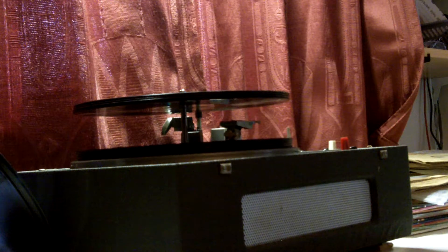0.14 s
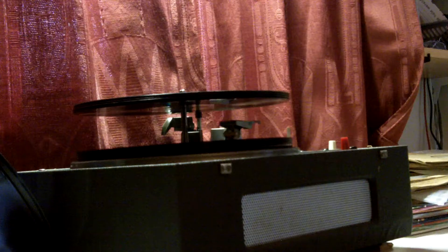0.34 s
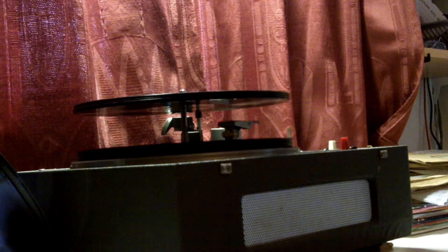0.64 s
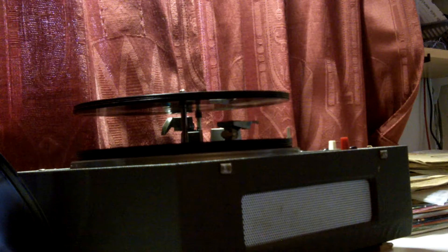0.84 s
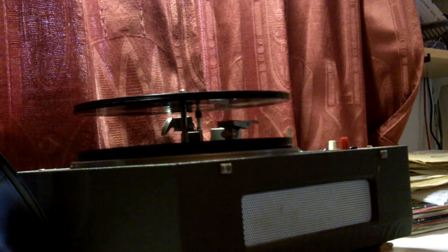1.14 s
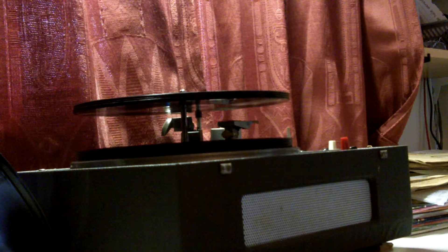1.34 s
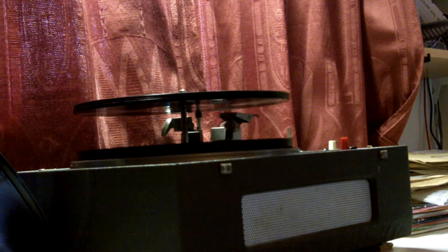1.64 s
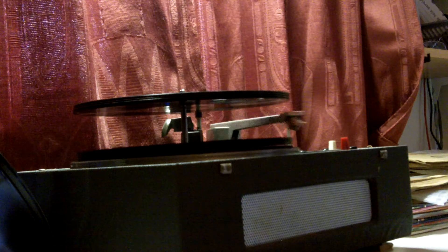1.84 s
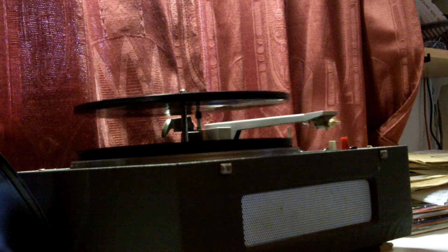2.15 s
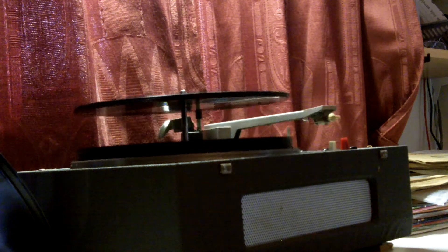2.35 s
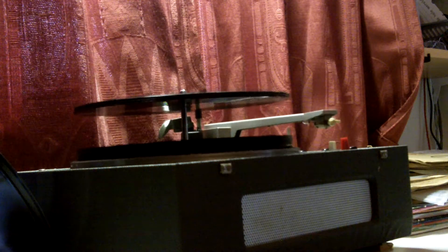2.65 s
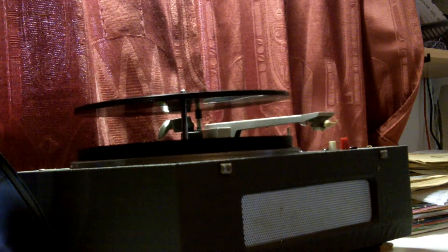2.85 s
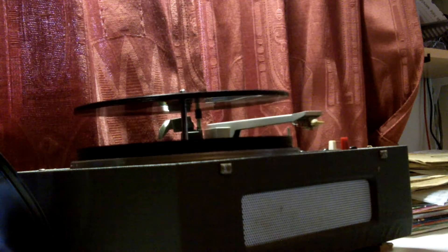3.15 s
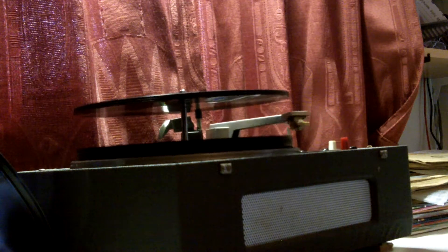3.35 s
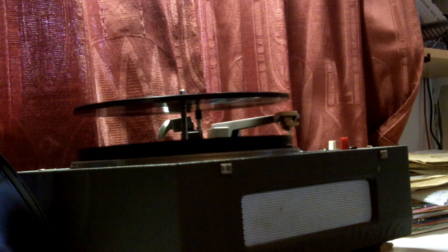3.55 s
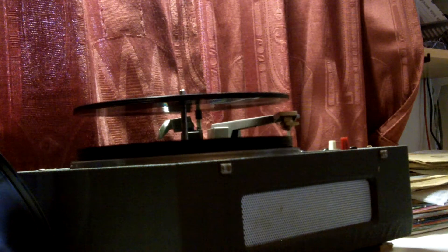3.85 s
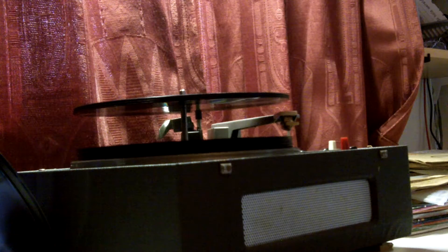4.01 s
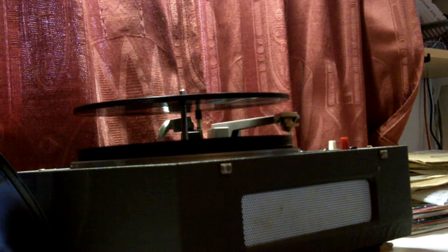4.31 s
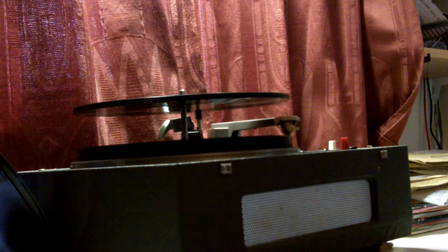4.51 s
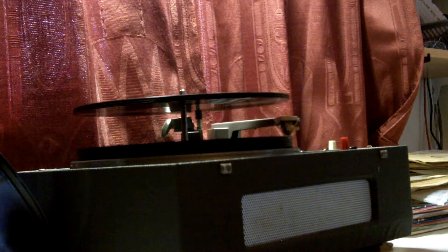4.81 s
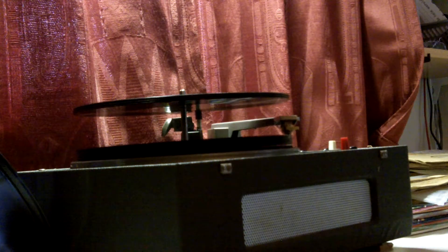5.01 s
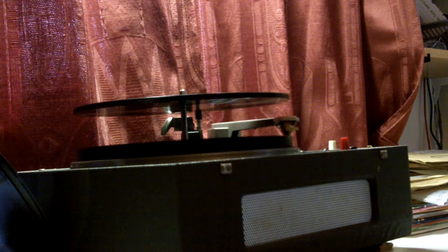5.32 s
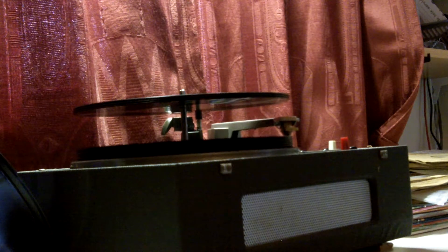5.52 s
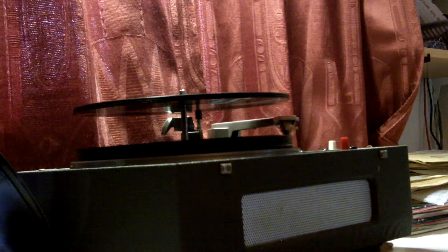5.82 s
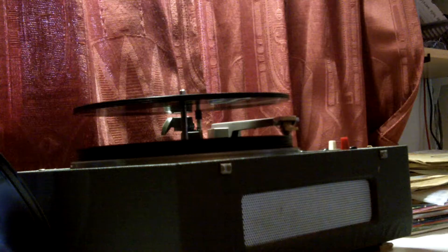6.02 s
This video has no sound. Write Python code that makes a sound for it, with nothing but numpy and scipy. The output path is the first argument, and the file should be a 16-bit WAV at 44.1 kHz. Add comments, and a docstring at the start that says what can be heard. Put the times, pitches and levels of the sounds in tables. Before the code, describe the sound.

Steel levers and cams of a record player knock against a deck plate and wooden cabinet, dry and close, with very short room reflections. Irregular bursts are separated by near-quiet holding only tiny ticks and faint rubbing. The strongest blows come in the middle; late on, a gear grinds softly with small woody ticks before one last clunk. Steady faint hum, deep room rumble and camera hiss lie behind.

```python
"""In a quiet curtained room, the changer of an old record player runs through its cycle close to a small camera.
Levers and cams click and clunk: each blow rings the steel parts, the deck plate and the wooden cabinet as
fading sines and noise bursts, and a few leave a thin part ringing. Between blows the cam gear rubs and ticks,
as noise through the same resonances. Behind it are motor hum, building rumble, air noise and camera hiss."""
import sys
import numpy as np
from scipy import signal
from scipy.fft import rfft, irfft, next_fast_len
from scipy.io import wavfile
from scipy.ndimage import map_coordinates

SR = 44100
rng = np.random.default_rng(int(sys.argv[2]) if len(sys.argv) > 2 else 0)


def dump_mix(stems):
    """Bounce the given channels to the path in sys.argv[1] as a 16-bit WAV at rate SR."""
    frames = np.atleast_2d(stems).T  # one column per channel
    limited = np.clip(frames, -1, 1)  # hard clip at full scale
    pcm = np.round(limited * 32767).astype(np.int16)
    wavfile.write(sys.argv[1], SR, pcm)


N = 272097

# Ways in which each part can ring: (pitch [Hz], relative level [dB], nominal time to fade by 60 dB [s])
# wooden cabinet
CABINET_MODES = [(179.5, 0.5, 0.18), (260.9, 0.5, 0.23), (308.7, -1.5, 0.16), (369.6, -7, 0.32)]
# deck plate
PLATE_MODES = [(560, -21, 0.072), (620, -12.5, 0.068), (765.8, -1.5, .11), (800, -7, 0.088),
               (901, -12.5, 0.079), (936, -12.5, 0.08)]
# steel levers
LEVER_MODES = [(1240, -1.5, 0.099), (1397, 3.5, 0.17), (1590, -3, 0.056), (1707, 4, 0.12),
               (1875, 6.5, 0.15), (2103, 7, 0.12), (2194, 10.5, 0.086), (2303, 7.5, 0.095),
               (2585, 9.5, 0.038)]
# pawls
PAWL_MODES = [(2954, -2, 0.052), (3140, -23.5, 0.013), (3300, -1.5, 0.099), (3442, 6, 0.074)]


def amp(db):
    """Turn decibels into a gain."""
    return 10 ** (np.asarray(db) / 20)


def unit(x):
    """Scale a signal to an rms of 1."""
    return x / np.sqrt(np.mean(x ** 2) + 1e-20)


def along(points, hz):
    """Read a value between (frequency, value) points on a nearly logarithmic frequency axis."""
    f, v = np.transpose(points)
    return np.interp(np.log(hz + 0.19), np.log(f + 0.066), v)


def curves(rows):
    """Draw one curve over the whole scene for each column after the time."""
    s, *cols = np.transpose(rows)
    return [np.interp(np.arange(N) / SR, s, c) for c in cols]


def wobble(rate):
    """Make a smooth random curve through `rate` random points a second."""
    points = rng.standard_normal(int(N * rate / SR) + 4)
    return map_coordinates(points, [np.arange(N) * rate / SR])


def filtered(x, response):
    """Filter a signal by multiplying its spectrum with a response to frequency."""
    n = x.shape[-1]
    m = next_fast_len(n + 8192)  # spare room keeps the filter's tail from wrapping round
    return irfft(rfft(x, m) * response(np.fft.rfftfreq(m, 1 / SR)), m)[..., :n]


def resonance(f, hz, width_hz):
    """Response of one resonance: 1 at its centre, weaker to both sides."""
    return 1j * f * width_hz / (hz * hz - f * f + 1j * f * width_hz)


def noise(spectrum):
    """Make noise of rms 1, coloured by (frequency, relative level) points."""
    return unit(filtered(rng.standard_normal(N), lambda f: amp(along(spectrum, f))))


def ring(modes, t, centre_hz, loss_db_per_octave, attack_s, damping, luck):
    """Ring a struck part as fading sines; modes near the centre are favoured, and luck varies each blow."""
    hz, db, t60 = (np.array(c)[:, None] for c in zip(*modes))
    octaves_away = np.abs(np.log2(hz / centre_hz))
    gain = amp(db - loss_db_per_octave * octaves_away + 1.9 * luck[:len(hz), None])
    fade = amp(-60 * t / (t60 * damping))
    phase = 2 * luck[-len(hz):, None]
    waves = gain * fade * np.sin(2 * np.pi * hz * t + phase)
    return waves.sum(0) * (1 - np.exp(-t / attack_s)) / np.linalg.norm(gain)


def clatter(t, centre_hz, width_hz, top_hz, t60, crack_db):
    """Countless short modes blur into noise around a centre: a crack, then a dying hiss, weaker above top_hz."""
    shape = amp(-60 * t / t60) + amp(crack_db - 60 * t / 0.0076)

    def colour(f):
        rolloff = (1 + 1j * f / top_hz) ** 3
        make_up = (1 + (centre_hz / top_hz) ** 2) ** 1.5  # restores the level at the centre
        return resonance(f, centre_hz, width_hz) / rolloff * make_up

    burst = filtered(rng.standard_normal(len(t)) * shape, colour)
    return burst / np.sqrt(width_hz * np.pi / SR)


def contacts():
    """List every contact of parts as a full row; some columns are the same for many contacts."""
    # Heavy blows of levers and cams; part levels are relative to the blow level:
    # (time [s], blow level [dB], cabinet level [dB], cabinet centre [Hz], plate level [dB], lever level [dB],
    #  lever centre [Hz], pawl level [dB], catch level [dB], catch centre [Hz], fade setting [s])
    heavy = [(1.1794, -28, -11, 151, -39, -23, 1770, -21, -8, 6200, .13),
             (1.1832, -22.5, -7.5, 214, -35, -35, 2730, -17, -8, 8760, 0.058),
             (1.2104, -33, -10, 280, -22, -8.5, 1210, -35, -26, 7110, 0.18),
             (1.2226, -26.5, -10, 179, -13, -10.5, 2090, -15, -12.5, 6040, 0.12),
             (1.2501, -28.5, -39, 277, -28, -7.5, 1420, -3.5, -8.5, 7300, 0.077),
             (1.3414, -39, -15, 151, -4, -2.5, 2210, -5, -10.5, 5740, 0.1),
             (1.5269, -39.5, -31, 151, -7.5, -7.5, 1680, -9.5, -12, 6300, 0.12),
             (1.9106, -24.5, -36, 350, -10.5, -7, 2070, -7.5, -2.5, 7000, .11),
             (1.9599, -40, -28, 197, -10, -34, 2760, -33, 0.5, 6440, 0.061),
             (2.0378, -41.5, -30, 172, -11, -7.5, 1640, -13, -15, 6640, 0.051),
             (2.2942, -20.5, -15, 283, -1.5, -18, 1380, -24, -11, 7000, 0.086),
             (2.3421, -27, -22, 320, -14, -11, 1820, -35, -10, 7200, .11),
             (2.391, -30, -25, 151, -18, -18, 1590, -15, 3, 7700, 0.14),
             (2.4109, -18.5, -18.5, 283, -32, -10.5, 2250, -22, -1.5, 7430, 0.12),
             (2.4274, -13, -33, 336, -14, -22, 2000, -43, -14, 7070, 0.15),
             (2.4394, -18, -18.5, 178, -8.5, -23, 2240, -29, -11, 6600, 0.06),
             (2.4514, -25.5, -20, 151, -28, -22, 2040, -28, 0.5, 7040, 0.052),
             (2.4714, -34, -12.5, 151, -25, -14, 1970, -26, -13, 6800, 0.19),
             (2.7427, -18, -37, 304, -12.5, -12.5, 2430, -8, -14.5, 6850, 0.077),
             (3.1004, -37.5, -36, 172, -6, -3, 2240, -6, -22, 6500, 0.091),
             (3.5414, -35, -11, 191, 9, -5, 1820, -23, -5, 6800, 0.078),
             (3.5453, -23.5, -9, 292, 3.5, -12.5, 2270, -23, -5.5, 7300, 0.08),
             (3.5937, -20.5, -19.5, 260, -8.5, -13, 2260, -27, -9, 7160, 0.088),
             (3.7808, -14.5, -24, 264, -2.1, -14.5, 1290, -21.5, -7, 7650, 0.094),
             (4.6853, -34, -6, 268, -6, -8, 1810, -9.5, -19, 7950, 0.047),
             (4.7905, -32.5, -4, 264, 0.5, -6.5, 1280, -10.5, -22.5, 7900, 0.044),
             (4.9484, -32.5, -7.5, 264, -18, -16.5, 1330, -45, -38, 7610, 0.13),
             (4.9601, -29.5, -28, 256, -18, -19.5, 1360, -20, -2, 7040, 0.076),
             (5.5972, -30.5, -3.5, 151, -15, -4.5, 1600, -24, -11, 6670, 0.12),
             (5.5992, -17.5, -14.5, 253, -4.5, -14.5, 2700, -18.5, -6.5, 6780, 0.081)]
    # Light ticks of loose parts:
    # (time [s], tick level [dB], cabinet level [dB], lever centre [Hz], catch level [dB])
    light = [(0.0917, -50.5, -6, 1320, -12), (0.399, -50, -6, 1800, -19), (0.4615, -49, -10, 1800, -14),
             (0.6897, -50.5, -6, 1900, -11), (0.8477, -42.5, 0.5, 1800, -24), (1.0374, -46, -19, 1860, -22),
             (1.4054, -43.5, -30, 1350, -16.5), (1.4561, -48, -28, 1770, -8), (1.6191, -48, 12, 2610, -29),
             (1.8038, -44, -22, 1360, -18.5), (2.2124, -48, -22, 1390, -4.5),
             (2.2907, -34.5, -29, 1750, -12), (2.5973, -50, -30, 1310, -6), (2.6978, -53, -9, 1390, -11),
             (3.2181, -66.5, -17, 1280, 7), (3.5164, -49, -3, 1590, -10.5), (3.5709, -36.5, -15, 1200, -21),
             (3.727, -58, -14, 1400, -25), (3.7778, -43, -26, 1400, 1), (3.925, -51, -22, 1410, -13),
             (4.013, -56.5, -14, 1350, -1), (4.2055, -53.5, -1.5, 1400, -21), (5.241, -55.5, 5, 1310, -8),
             (5.5398, -56, 0, 1300, -16), (5.6298, -54, 15.5, 1420, -12)]
    # Teeth of the cam gear dropping into mesh:
    # (time [s], tooth level [dB], cabinet level [dB], cabinet centre [Hz], pawl level [dB])
    mesh = [(4.715, -48, -15, 256, -14), (4.7358, -51, 0, 191, -14), (4.8452, -42.5, -1, 194, -15),
            (4.8745, -46, -14, 178, -17), (4.897, -49, -9, 183, -20), (4.9264, -44.5, -3, 291, -24),
            (5.009, -44.5, -7, 258, -15), (5.044, -42, 1.5, 210, -6), (5.0591, -42, -9, 183, -17),
            (5.078, -41.5, -17, 188, -18), (5.1073, -45.5, -1, 275, -9), (5.1312, -53.5, 14.5, 178, -12)]

    # fill in the missing columns, in the order of the heavy blows
    tick_rows = [(s, db, box_db, 194.4, -16, -9, lever_hz, -14, catch_db, 6770, 0.11)
                 for s, db, box_db, lever_hz, catch_db in light]
    tooth_rows = [(s, db, box_db, box_hz, -7, -8, 1930, pawl_db, -24, 6900, 0.086)
                  for s, db, box_db, box_hz, pawl_db in mesh]
    return heavy + tick_rows + tooth_rows


def blows():
    """Every blow shakes cabinet, plate, levers, pawls and catches in its own proportions."""
    # Modes of the small catches: (pitch [Hz], relative level [dB], nominal time to fade by 60 dB [s])
    catch_modes = [(5420, 8, 0.084), (5730, 2, 0.1), (6300, -26, .07), (5980, 4, 0.088), (6350, 0, 0.09),
                   (6430, 12.5, 0.088), (6890, 19, 0.026), (7400, -17, .1), (8300, 2, .1), (8650, -20, .08),
                   (8450, 0, .08), (9200, -20, .08)]
    out, t = np.zeros(N + SR), np.arange(SR * 2 // 5) / SR
    rows = contacts()
    lucks = rng.standard_normal((len(rows), 6, 24))
    for row, luck in zip(rows, lucks):
        s, db, box_db, box_hz, plate_db, lever_db, lever_hz, pawl_db, catch_db, catch_hz, t60 = row
        thud_db = -13 - 0.35 * (db + 45)  # a harder contact has a relatively weaker dull knock
        damping = np.clip(t60, .02, .4) / .12  # a part that is held rings shorter
        # the share of clear ringing against grating noise varies at random from blow to blow
        clean = 0.51 + 0.082 * luck[5, 0]
        tone, grit = np.sqrt(np.clip([clean, 1 - clean], .02, .98))

        box = ring(CABINET_MODES, t, box_hz, 23.8, 0.0036, 0.85, luck[0])
        thud = clatter(t, 760, 430, 1770, .1 * damping, 4.4)
        plate = ring(PLATE_MODES, t, 550, 2.8, 0.0029, damping, luck[1])
        lever = tone * ring(LEVER_MODES, t, lever_hz, 26 * clean, 0.0011, damping, luck[2])
        lever += 0.89 * grit * clatter(t, lever_hz, 830, 2820, .11 * damping, 0)
        pawl = tone * ring(PAWL_MODES, t, 3600, 3, 0.0017, damping, luck[3])
        pawl += 0.97 * grit * clatter(t, 3080, 810, 6400, .1 * damping, 0)
        catch = 0.8 * tone * ring(catch_modes, t, catch_hz, 36 * clean, 0.0012, damping, luck[4])
        catch += 1.075 * grit * clatter(t, catch_hz, 1480, 8800, .11 * damping, 0.73)

        panels = amp(box_db) * box + amp(thud_db) * thud + amp(plate_db) * plate
        panels *= 1 - np.exp(-t / 0.0026)  # large panels take time to answer
        steel = amp(lever_db) * lever + amp(pawl_db) * pawl + amp(catch_db) * catch
        out[round(s * SR):][:len(t)] += amp(db) * (panels + steel)
    return filtered(out[:N], lambda f: 1 / (1 + 1j * f / 13000) ** 2)  # blunt contacts carry little treble


def springs():
    """A spring or thin part rings on as a pure tone that slowly fades."""
    # Ringing parts: (pitch [Hz], time to fade by 60 dB [s], list of starts (time [s], level [dB]))
    ringing_parts = [(803, .9, [(2.295, -57), (3.781, -56), (5.599, -59)]), (2190, .15, [(2.743, -33),
                     (3.1, -50), (3.781, -51)]), (5680, .4, [(3.781, -53)])]
    out, t = np.zeros(N + SR), np.arange(SR) / SR
    for hz, t60, starts in ringing_parts:
        for s, db in starts:
            out[round(s * SR):][:SR] += amp(db - 60 * t / t60) * np.sin(2 * np.pi * hz * t)
    return out[:N]


def body(modes, spread):
    """Response of a rubbed part: its resonances added with alternating sign, broader where they fade faster."""
    def response(f):
        return sum((-1) ** k * amp(db) * resonance(f, hz, spread / t60)
                   for k, (hz, db, t60) in enumerate(modes))
    return response


def gear():
    """The cam gear rubs unevenly and ticks faintly; this friction noise shakes cabinet, plate and levers."""
    # Strength of the rubbing in each part: (time [s], cabinet level [dB], plate level [dB], lever level [dB])
    rubbing = [(0.0, -65.5, -79, -67.5), (0.69, -64.5, -77, -66), (1.2, -67.5, -74, -63.5),
               (1.4, -72, -68, -68.5), (1.65, -74, -66, -71.5), (2.37, -70, -70, -70.5),
               (2.9, -70.5, -75, -81), (3.56, -74.5, -71, -80), (3.71, -70, -63.5, -68.5),
               (4.02, -78, -71.5, -78.5), (4.4, -76, -70.5, -77), (4.85, -55.5, -71, -71),
               (4.98, -49.5, -72, -63), (5.1, -63.5, -74, -72), (5.57, -61, -69, -69.5),
               (6.17, -68, -78, -72.5)]
    box_db, plate_db, lever_db = curves(rubbing)
    # about 45 ticks a second at random, each a brief surge in the rubbing
    ticks = (rng.random(N) < 45 / SR) * amp(2.2 * rng.exponential(size=N))
    surge = amp(-60 * np.arange(SR // 10) / SR / .03)
    rough = 1 + .9 * signal.fftconvolve(ticks, surge)[:N]
    rub = amp(wobble(7.4)) * rough
    sway_db = 1.5 * wobble(6)

    cabinet = body(CABINET_MODES, 3.8)
    box = unit(filtered(rng.standard_normal(N), lambda f: cabinet(f) / (1 + (f / 260) ** 2)))
    plate = unit(filtered(rng.standard_normal(N) * rub, body(PLATE_MODES, 3.9)))
    lever = unit(filtered(rng.standard_normal(N) * rub, body(LEVER_MODES + PAWL_MODES, 36)))
    whirr = unit(filtered(rng.standard_normal(N) * rub, lambda f: resonance(f, 5060, 1000) ** 2))
    low = amp(box_db + sway_db) * box + amp(plate_db) * plate
    return low + amp(lever_db) * lever + amp(lever_db - 14) * whirr


def tones(lines, sway_db, drift):
    """Add steady tones that waver a little in level (dB) and phase (radians)."""
    t = np.arange(N) / SR
    out = np.zeros(N)
    for hz, db in lines:
        level = np.sqrt(2) * amp(db + sway_db * wobble(3.2))  # a sine peaks at root 2 times its rms
        out += level * np.sin(2 * np.pi * hz * t + drift * wobble(8.0))
    return out


def motor_hum():
    """The mains-driven motor hums on low, steady tones."""
    # Hum tones: (pitch [Hz], average rms level [dB])
    hum_lines = [(100, -66.5), (200, -80)]
    return tones(hum_lines, 1.3, 0.28)


def camera_whine():
    """The camera adds thin, high tones that waver."""
    # Whine tones: (pitch [Hz], average rms level [dB])
    whine_lines = [(5561, -91), (6223, -94), (6621, -82.5), (6955, -89.5), (7165, -82), (7224, -94),
                   (7865, -83.5), (8452, -91.5), (8484, -90), (9022, -100), (9561, -100), (12710, -92)]
    return tones(whine_lines, 2.7, 1.0)


def building_rumble():
    """The building rumbles as deep noise that sways in level and swells twice."""
    # Colour of the steady rumble: (frequency [Hz], relative level [dB])
    rumble_colour = [(1, -28), (2.5, 5), (9, -6.5), (16, -5.5), (30, -10), (60, -17), (90, -23),
                     (200, -32.5), (600, -41.5), (2000, -84)]
    # Colour of the swells: (frequency [Hz], relative level [dB])
    swell_colour = [(5, -20.5), (20.5, -6), (50, 2), (75, -17), (130, -56)]
    # Deep swells: (time of the middle [s], level [dB], time from the middle to 1/e of the height [s])
    swell_times = [(2.37, -52, 0.16), (5.42, -47, 0.14)]
    t = np.arange(N) / SR
    swells = sum(amp(db) * np.exp(-((t - s) / width) ** 2) for s, db, width in swell_times)
    steady = amp(-50 + 2.2 * wobble(3.43)) * noise(rumble_colour)
    return steady + swells * noise(swell_colour)


def room_air():
    """The room air is a steady, faint noise."""
    # Colour of the air: (frequency [Hz], relative level [dB])
    air_colour = [(100, -17), (500, 5), (1000, 4), (2500, -5.5), (4500, -10.5), (6000, -6), (7500, -1),
                  (10000, -12), (16000, -12)]
    return amp(-67.5) * noise(air_colour)


def room(x):
    """Near walls send early echoes, then a short noise-like tail dies at a speed set by frequency."""
    # Early echoes: (delay [s], level [dB])
    echoes = [(.0045, -14), (.0098, -9), (.0135, -16), (.019, -13.5)]
    # Fading of the tail: (frequency [Hz], time to fade by 60 dB [s])
    tail_times = [(200, 0.33), (1000, 0.19), (4000, 0.17), (12000, 0.16)]
    hz, t, z = signal.stft(rng.standard_normal(SR // 2), SR, nperseg=256)
    fade = amp(-60 * t / along(tail_times, hz)[:, None])
    tail = signal.istft(z * fade, SR, nperseg=256)[1]
    late = signal.fftconvolve(np.pad(x, (400, 0)), tail / np.linalg.norm(tail))[:N]  # 400 samples late
    early = sum(amp(db) * np.pad(x, (round(s * SR), 0))[:N] for s, db in echoes)
    return x + amp(-11.5) * late + early


def scene():
    """Mix all sources for one microphone that feeds both channels; blows and springs also fill the room."""
    player = room(blows() + springs()) + gear() + motor_hum()
    mix = player + camera_whine() + building_rumble() + room_air()
    return np.tile(mix, (2, 1))


def record(dry):
    """The microphone cavity weakens a band; hiss of opposite sign in the channels, a band limit and offset follow."""
    # Colour of the camera hiss: (frequency [Hz], relative level [dB])
    hiss_colour = [(5, 31.5), (45, 20.5), (60, 22.5), (100, -10), (300, 2.5), (1500, -2.5), (3000, -15),
                   (4500, -29), (6500, -10), (9000, -4), (16000, -3.5)]
    # Constant offset, one row per channel: (offset [fraction of full scale])
    channel_offset = [
        [-.00759],
        [-.00694],
    ]
    notch_hz, top_hz = 4210, 15350

    def cavity(f):
        broad_dip = 1 - 0.91 * resonance(f, notch_hz, 2360)
        narrow_dip = 1 - 0.43 * resonance(f, notch_hz, 430)
        return broad_dip * narrow_dip

    hiss = amp(-72.5) * noise(hiss_colour) * [[1], [-1]]
    wet = filtered(dry, cavity) + hiss
    return filtered(wet, lambda f: f < top_hz) + channel_offset


dry = scene()
out = record(dry)
dump_mix(out)
```